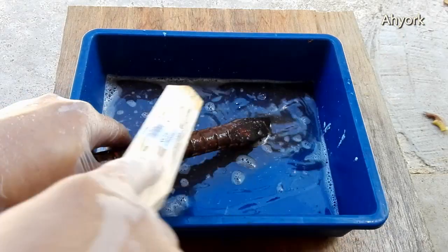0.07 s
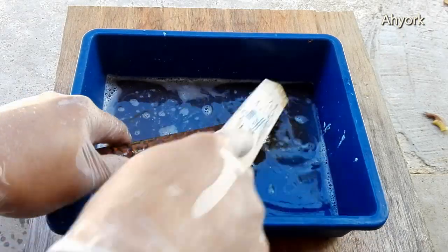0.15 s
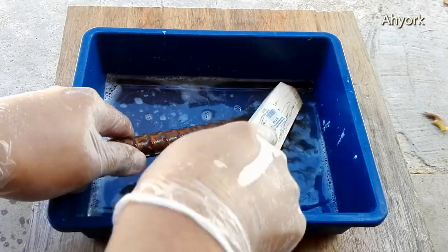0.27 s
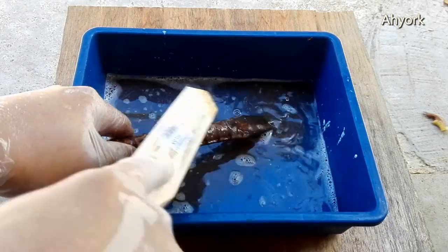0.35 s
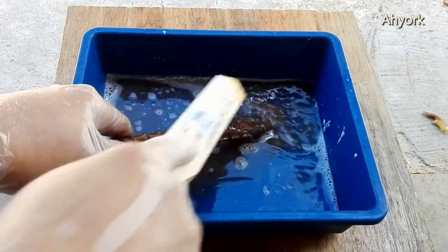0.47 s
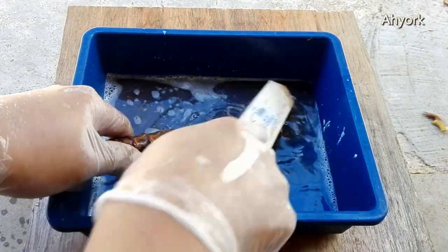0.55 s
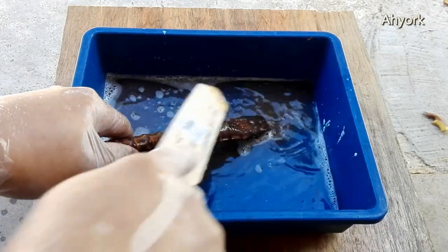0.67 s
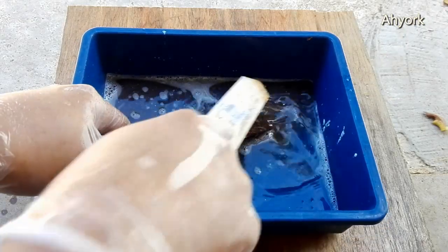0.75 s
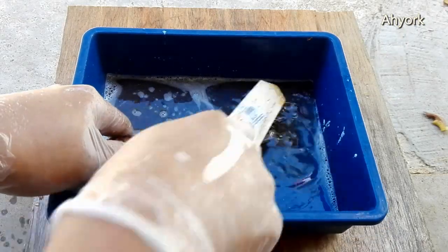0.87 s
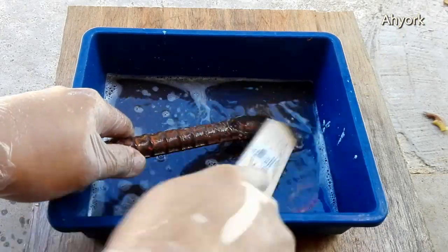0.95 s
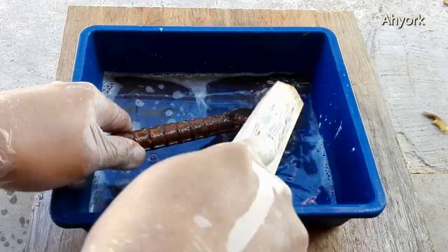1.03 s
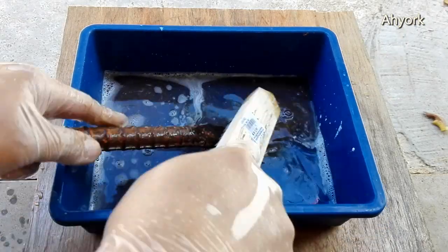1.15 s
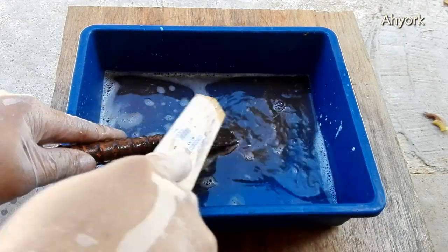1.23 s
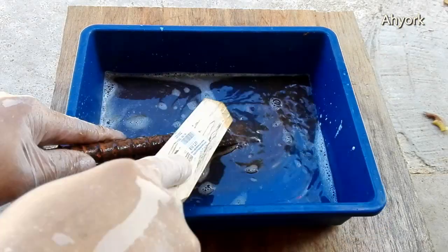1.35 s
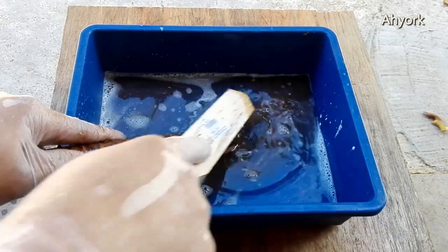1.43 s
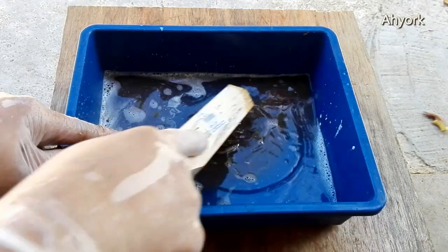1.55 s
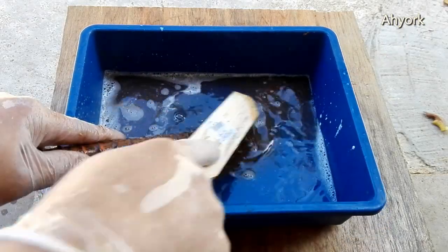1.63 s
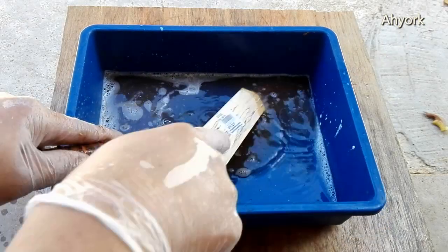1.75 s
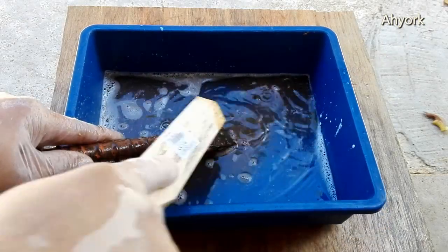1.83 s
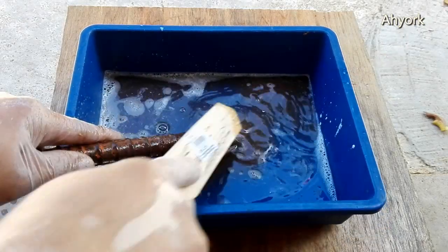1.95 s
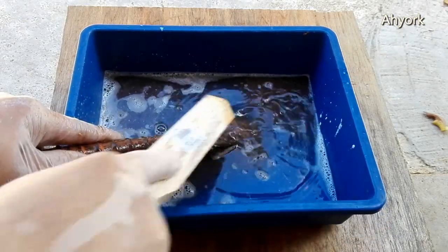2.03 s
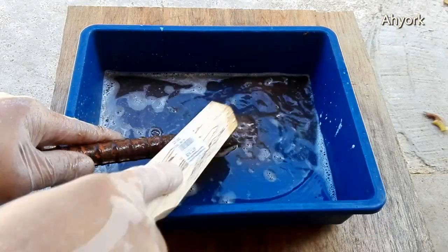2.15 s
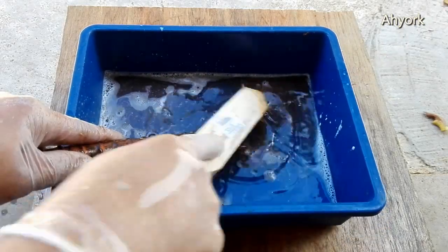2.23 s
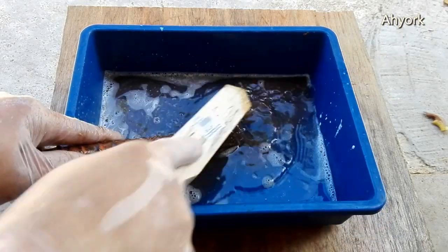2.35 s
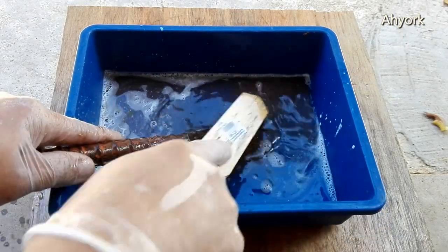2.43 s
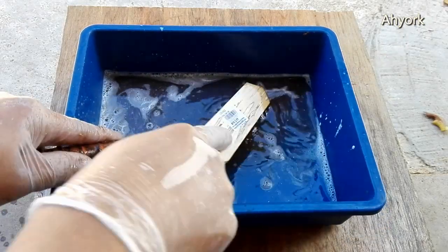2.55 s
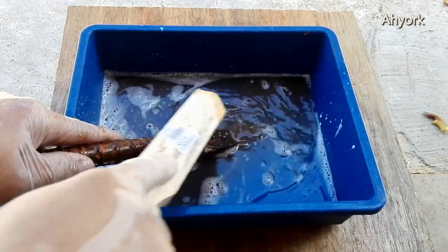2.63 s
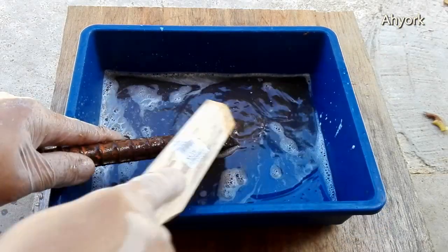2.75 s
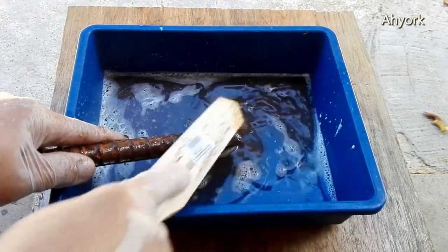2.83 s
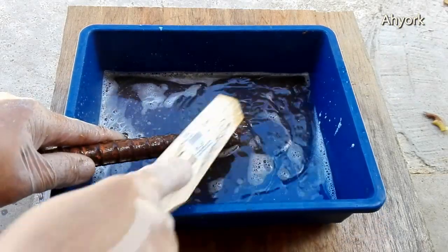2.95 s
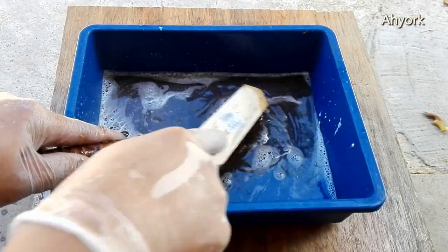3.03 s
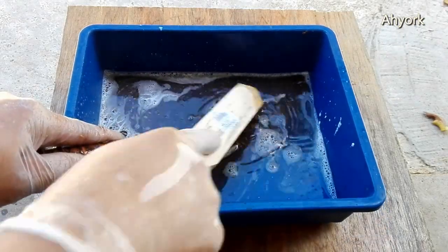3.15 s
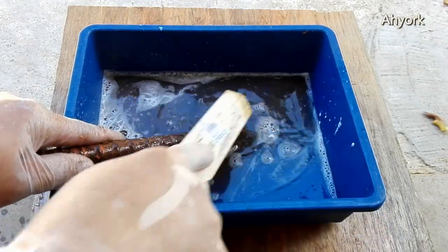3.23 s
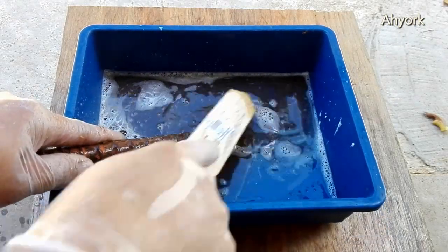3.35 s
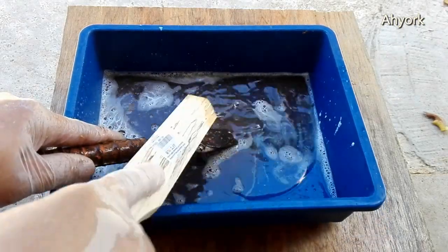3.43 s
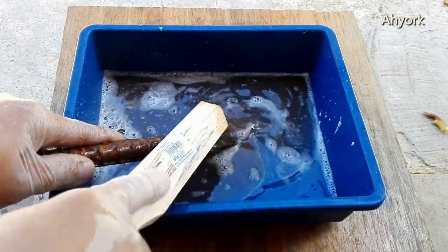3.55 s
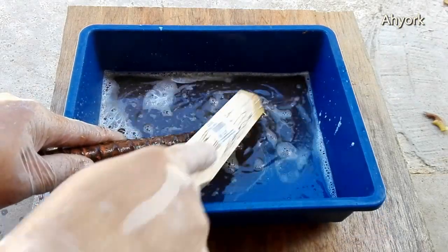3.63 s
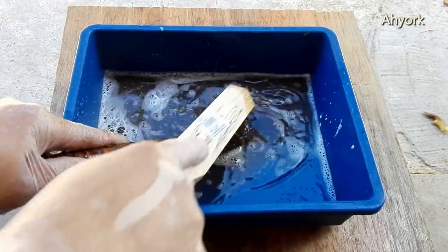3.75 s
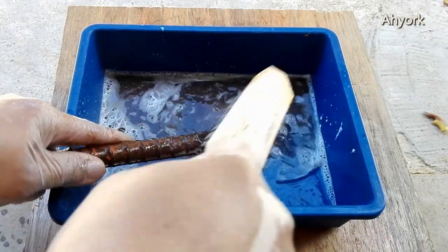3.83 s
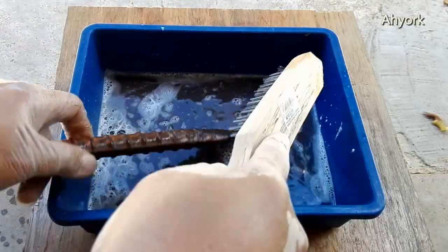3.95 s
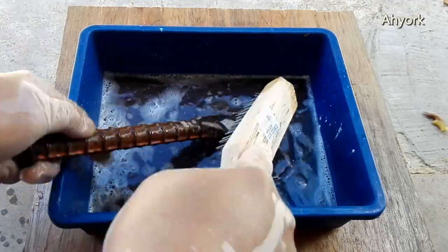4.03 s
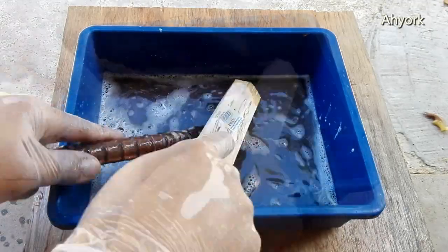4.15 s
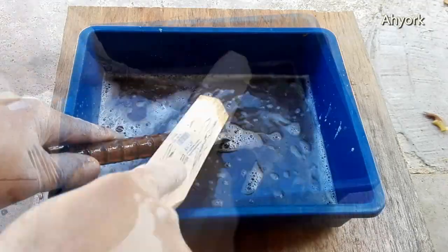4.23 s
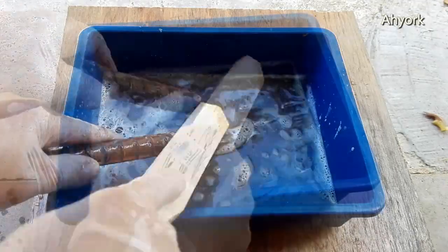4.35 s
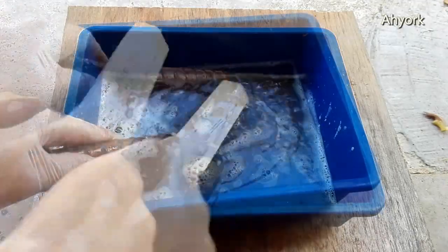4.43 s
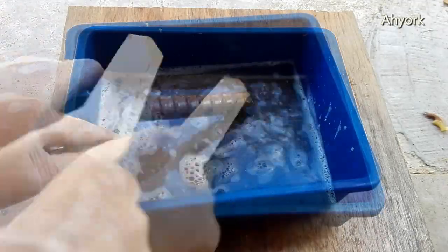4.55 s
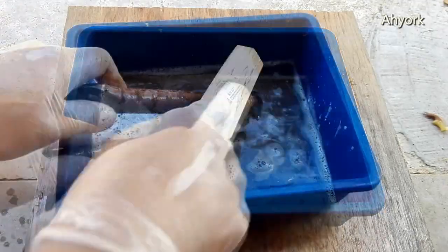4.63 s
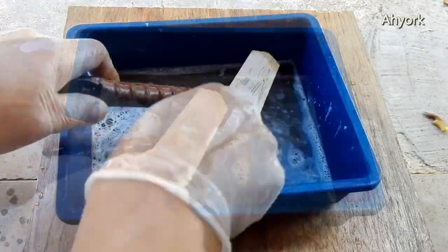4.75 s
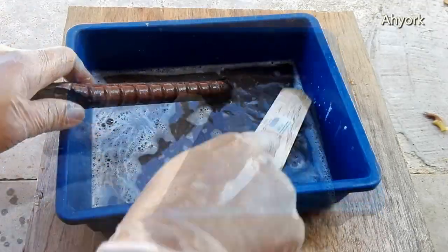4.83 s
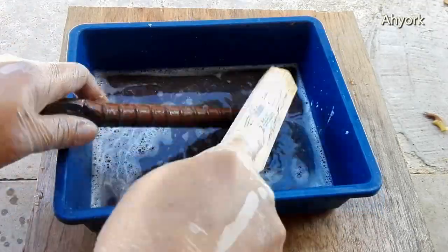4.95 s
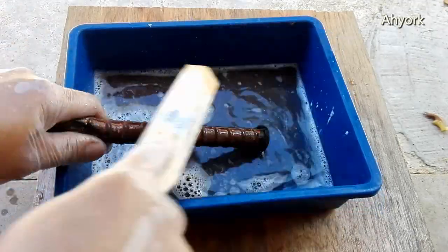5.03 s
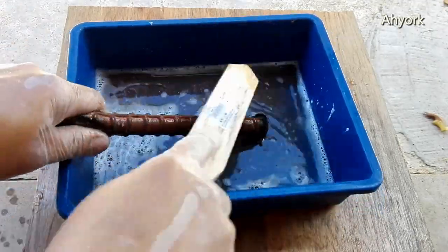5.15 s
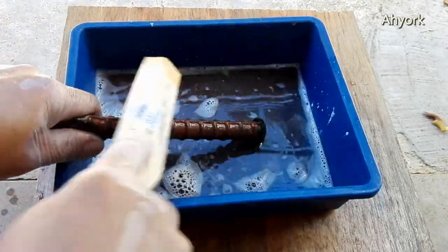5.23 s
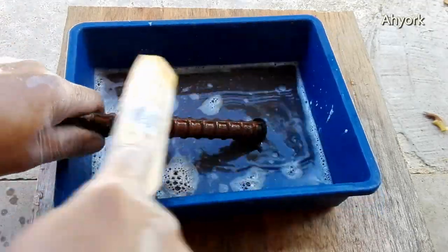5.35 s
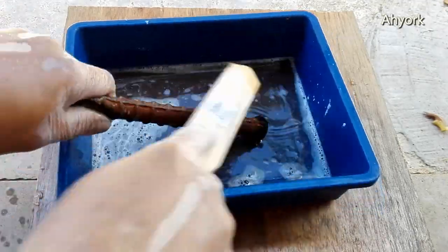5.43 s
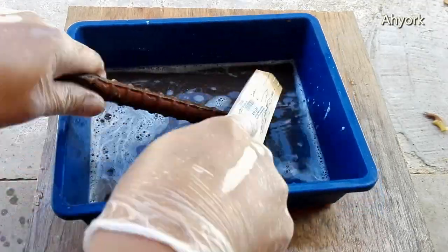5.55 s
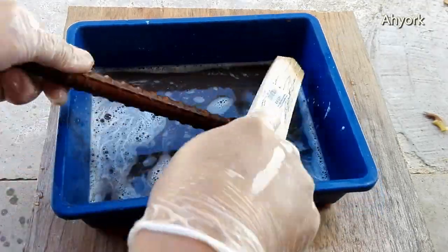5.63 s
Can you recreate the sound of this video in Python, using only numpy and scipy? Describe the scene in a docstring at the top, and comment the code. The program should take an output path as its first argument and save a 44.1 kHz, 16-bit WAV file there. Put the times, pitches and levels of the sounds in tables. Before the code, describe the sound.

A wire brush scrubs a rusty metal rod very fast in a tub of shallow water, harsh crackling hiss with short pauses and small knocks.

```python
"""A dense crackling hiss comes first: a steel wire brush scrubs a rusty rod in a plastic tub of shallow water.
It goes to and fro, mostly 14 to 18 strokes a second. Random clicks, filtered like bristles, make the hiss;
clicks through resonances make the rod and tub shake. Noise bursts and ringing tones make the rod's knocks.
Tiny noise grains crunch like rust, low noise sloshes and short fading tones gulp.
Behind it all are faint echoes and a steady outdoor hush."""
import sys
import numpy as np
from scipy import signal
from scipy.fft import rfft, irfft
from scipy.io import wavfile

SR = 44100
rng = np.random.default_rng(int(sys.argv[2]) if len(sys.argv) > 2 else 0)


def pcm_store(signal):
    """Save signal as 16-bit PCM."""
    levels = np.round(np.clip(np.atleast_2d(signal), -1, 1) * 32767)
    wavfile.write(sys.argv[1], SR, levels.astype(np.int16).T)


N = 250488
T = np.arange(N) / SR


def undb(db):
    """Turn decibels into gain."""
    return 10 ** (np.asarray(db) / 20)


def unit(x):
    """Scale each row to an average (rms) strength of 1."""
    return x / np.sqrt(np.mean(x ** 2, axis=-1, keepdims=True) + 1e-18)


def bins(size):
    """List the frequencies of a spectrum in Hz, kept above zero."""
    return np.maximum(np.fft.rfftfreq(size, 1 / SR), 1)


def shape(points, hz):
    """Read the gain at each frequency from a table of (Hz, dB) points."""
    f, db = np.transpose(points)
    return undb(np.interp(np.log(hz), np.log(f), db))


def colour(x, gain):
    """Filter a sound with one gain per frequency, without any sound before its start."""
    size = x.shape[-1]
    # folding the cepstrum forward in time gives a minimum-phase filter
    cepstrum = irfft(np.log(gain + 1e-6), size)
    cepstrum[1:size // 2] *= 2
    cepstrum[size // 2 + 1:] = 0
    return irfft(rfft(x) * np.exp(rfft(cepstrum)), size)


def add(out, s, x):
    """Mix a stereo sound in at time s."""
    i = int(s * SR)
    a, b = max(i, 0), min(i + x.shape[1], N)
    out[:, a:b] += x[:, a - i:b - i]


def walk(rate, size):
    """Wander at random between new values drawn rate times a second, with a spread near 1."""
    knots = rng.standard_normal(1024)
    return 1.2 * np.interp(np.arange(size) / SR * rate, np.arange(1024), knots)


def flicks(rate, spread_db, size):
    """Make two rows of random clicks, rate per second, of widely varying strength."""
    strength = undb(spread_db * np.clip(rng.standard_normal((2, size)), -3, 2.5))
    happens = rng.random((2, size)) < rate / SR
    return happens * rng.choice([-1, 1], (2, size)) * strength


# How wide the sound is. Each row: frequency in Hz, level of the side against the middle in dB.
SIDE_LEVEL = [(30, -29), (100, -18.5), (1000, -19.5), (1900, -14), (2450, -12), (2800, -7.5), (5500, -8),
              (8000, -8), (10000, -6), (11300, -24), (12800, -5), (13800, -8), (16000, -10)]


def stereo(pair):
    """Make left and right from two unrelated rows, middle and side; the treble is wider than the bass."""
    mid = pair[0]
    side = colour(pair[1], shape(SIDE_LEVEL, bins(pair.shape[1])))
    return np.array([mid + side, mid - side])


# Spells of even scrubbing, each opening with a push. Each row: start in seconds, end in seconds,
# number of strokes, share of a cycle spent pushing, time the bent wires scrape past each turn in seconds,
# bristle hiss in dB, rod and tub in dB on a push, rod and tub in dB on a pull.
# These levels are settings: scrubbing() lifts them, and the hiss varies from stroke to stroke.
SPELLS = [(-.087, 0.344, 6, 0.5, 0.0033, -31, -53.5, -60.5),
          (0.341, 0.775, 6, .55, 0.0035, -29, -42.5, -53),
          (0.779, 1.037, 4, 0.57, 0.0014, -29.5, -43, -53.5),
          (1.259, 1.716, 8, 0.46, 0.0046, -33, -43.5, -51.5),
          (1.717, 2.067, 6, 0.41, 0.007, -31, -43, -53.5), (2.062, 2.623, 10, 0.49, 0.005, -31, -42.5, -49),
          (2.62, 3.205, 10, 0.56, 0.0034, -30.5, -44, -52.5),
          (3.202, 3.854, 11, 0.53, 0.0085, -30.5, -45.5, -50),
          (4.236, 4.48, 4, .52, 0.0062, -35.5, -49.5, -54.5),
          (4.469, 4.746, 4, 0.58, 0.015, -34.5, -51, -55.5),
          (4.74, 4.835, 1, 0.41, 0.0044, -34.5, -55.5, -55),
          (5.065, 5.206, 2, 0.47, 0.0025, -34, -46.5, -59.5),
          (5.207, 5.59, 6, 0.54, 0.0029, -31, -59.5, -59.5)]
STROKE_SPREAD_DB = 1.5  # no two strokes are alike
PUSH_LEAN_DB, PULL_LEAN_DB = 6.3, 8  # growth during a stroke, roughly from first half to second
# the dip in the tone of a push and of a pull: shift of its centre in octaves, half width in Hz
PUSH_DIP, PULL_DIP = (.12, 270), (-.06, 430)


def to_and_fro():
    """Alternate pushes and pulls: rows (start s, end s, hiss dB, rod and tub dB, growth dB, dip)."""
    strokes = []
    for start, end, count, push_share, overlap_s, hiss_db, push_db, pull_db in SPELLS:
        k = np.arange(count + 1)
        # a whole cycle is a push and a pull
        cycles = k // 2 + push_share * (k % 2)
        turns = start + (end - start) * cycles / cycles[-1]
        for i, effort in enumerate(rng.standard_normal(count)):
            push = (push_db, PUSH_LEAN_DB, PUSH_DIP)
            pull = (pull_db, PULL_LEAN_DB, PULL_DIP)
            way = pull if i % 2 else push
            strokes.append((turns[i], turns[i + 1] + overlap_s, hiss_db + STROKE_SPREAD_DB * effort, *way))
    return strokes


# The brush grazes the rod while it is shifted. Each row: start in seconds, end in seconds,
# bristle hiss in dB, rod and tub in dB, growth in dB (both levels before the lift in scrubbing()).
GRAZES = [(1.024, 1.079, -47, -57.5, 5), (1.13, 1.261, -52.5, -63, 0), (4.018, 4.122, -59.5, -83, 14),
          (4.139, 4.224, -55, -64, 9), (4.841, 4.972, -43, -54.5, 1), (4.96, 5.039, -49, -62, -1),
          (5.569, 5.684, -54.5, -80, -16)]


def grazes():
    """Treat each light graze as a stroke with the tone dip of a pull."""
    return [(*graze, PULL_DIP) for graze in GRAZES]


# the wires catch unevenly on the rust: slow and fast swing of the force
SLOW_CATCH_DB, FAST_CATCH_DB = 1.0, 1.2
DIP_RISE_OCT = .18  # the dip climbs this far during a stroke


def scrubbing(strokes, size=8192):
    """Each stroke speeds up and eases off; tufts catch on the rust and let their wires go in bursts."""
    out, hz, t = np.zeros((2, N)), bins(size), T[:size]
    for start, end, hiss_db, tub_db, lean_db, (shift_oct, width_hz) in strokes:
        span = max(end - start, .02)
        lead = span / 10
        # place along the stroke: 0 at its start, 1 at its end
        along = np.minimum((t - lead) / span, 1.1)
        catching_db = SLOW_CATCH_DB * walk(132.6, size) + FAST_CATCH_DB * walk(599.0, size)
        force = undb(1.1 * lean_db * (along - .5) + catching_db)

        # under a light touch few wires flick and the hiss turns to crackle
        rate = 9000 * undb(0.57 * (hiss_db + 30.5))
        # now and then a bent wire snaps free with a tick of its own
        ticks = undb(-14) * unit(flicks(45, 4, size))
        wires = unit(flicks(rate, 3, size)) + ticks
        speed = glide(along, bite=.25, release=.4, rest=.28)
        hiss = colour(wires * force * speed, bristle_gain(start, hz, hiss_db))

        # the shaking of rod and tub grows less along the stroke than the hiss
        push = force * glide(along, bite=.2, release=.55, rest=.22) * undb(-4 * along)
        ring = tub(flicks(1200, 4, size) * push, start)
        sound = undb(hiss_db + 1.03) * unit(hiss) + undb(tub_db + 2.5) * unit(ring)

        # fade from a lower dip to a higher one during the stroke
        low_oct, high_oct = shift_oct - DIP_RISE_OCT / 2, shift_oct + DIP_RISE_OCT / 2
        early = colour(sound, tone_dip(start, hz, hiss_db, low_oct, width_hz))
        late = colour(sound, tone_dip(start, hz, hiss_db, high_oct, width_hz))
        sound = early + (late - early) * np.clip(2 * along - .5, 0, 1)
        # the square root keeps the level right over the stroke itself
        add(out, start - lead, stereo(sound * np.sqrt(span / t[-1])))
    return out


def glide(along, bite, release, rest):
    """Sliding speed over a stroke: the wires bite, run and ease off; a soft rustle carries over the turn."""
    rise = np.clip(along / bite, 0, 1)
    fall = np.clip((1 - along) / release, 0, 1)
    rustle = np.clip(5 * np.minimum(along + .1, 1.1 - along), 0, 1)
    return np.sin(np.pi / 2 * rise) ** 4 * np.sin(np.pi / 2 * fall) ** 2 + rest * rustle


# below a firm touch the hiss dulls: its level there, the range down to the lightest touch
FIRM_DB, TOUCH_RANGE_DB = -36.5, 0.5
FIRM_TILT_DB, LIGHT_TILT_DB = 0.06, -4  # brightness in dB per octave


def firmness(level_db):
    """Tell how hard the brush is pressed: 0 for the lightest touch, 1 for firm scrubbing."""
    return np.interp(level_db, [FIRM_DB - TOUCH_RANGE_DB, FIRM_DB], [0, 1])


# Tone of the scrubbing over time, with a thin place in the sound between low ring and hiss.
# Each row: time in seconds, wire resonance in Hz, its lift in dB, lower edge of the hiss in Hz,
# centre of the thin place (the dip) in Hz, its depth in dB.
# The wire resonance and the dip are varied at random around these values.
SCRUB_TONE = [(0, 11500, 1, 2830, 1630, -16), (.3, 12400, 8.5, 2680, 1960, -18),
              (.95, 12250, -1, 2720, 1950, -12), (2, 12000, -0.5, 2800, 2080, -10),
              (2.6, 11200, 1.5, 2370, 2380, -12), (3.7, 11000, 0.5, 2470, 2350, -13),
              (4.3, 10850, 0.5, 2830, 1820, -9), (4.9, 11400, 6.5, 2840, 1700, -9),
              (5.101, 11000, 8.5, 3130, 1390, -30), (5.6, 10000, 4, 3200, 1320, -10)]
# Basic colour of the bristle hiss. Each row: frequency in Hz, level in dB per Hz.
BRISTLE_COLOUR = [(2800, -7), (4400, -5.5), (5200, -2.5), (5600, -.5), (6100, -3), (7100, 0), (8000, -3.5),
                  (9000, -1), (9700, 0), (11000, 2), (12400, 3), (13500, -4), (15700, 0.5)]


def bristle_gain(s, hz, level_db=0, wire_width_hz=600, wire_scatter=0.021, leak_db=-9, ripple_db=2.33):
    """Colour of one stroke: a steep lower edge, ringing wires and a random ripple; a light touch is duller."""
    times, *columns, _, _ = np.transpose(SCRUB_TONE)
    wire_hz, wire_db, edge_hz = (np.interp(s, times, c) for c in columns)
    tilt_db = LIGHT_TILT_DB + (FIRM_TILT_DB - LIGHT_TILT_DB) * firmness(level_db)
    wire_hz = wire_hz * (1 + wire_scatter * rng.standard_normal())
    # a little sound leaks through below the edge
    leak = undb(leak_db - 0.88 * tilt_db) * hz / (hz + 700) / (1 + (hz / edge_hz) ** 10)
    edge = 1 / np.sqrt(1 + (edge_hz / hz) ** 20) + leak
    wires = wire_db / (1 + ((hz - wire_hz) / wire_width_hz) ** 2)
    tilt = tilt_db * np.log2(np.maximum(hz, edge_hz) / 8000)
    ripple = np.interp(hz, np.linspace(0, SR / 2, 70), rng.standard_normal(70))
    return shape(BRISTLE_COLOUR, hz) * edge * undb(wires + tilt + ripple_db * ripple)


def tone_dip(s, hz, level_db, shift_oct, width_hz):
    """A thin place in a firm stroke's sound, between low ring and hiss; its place and depth vary at random."""
    times, *_, centres, depths = np.transpose(SCRUB_TONE)
    centre_hz = np.interp(s, times, centres) * 2 ** (shift_oct + .08 * rng.standard_normal())
    depth_db = firmness(level_db) * np.interp(s, times, depths) * rng.uniform(.5, 1.5)
    return undb(depth_db * np.exp(-2 * ((hz - centre_hz) / width_hz) ** 2))


# Resonances (modes) of the rod and tub. Each row: typical frequency in Hz, width in Hz,
# typical level in dB in the first grip, in the second, in the third.
TUB_MODES = [(446, 88, -10, -12.5, 0.5), (534, 85, 1, -7, -11), (620.3, 63, -5.5, 0.5, -1),
             (670, 153, -8.5, -0.5, -0.5), (973.4, 70, 0.5, 3.5, -3), (1064, 94, 0.5, -3, -20),
             (1137, 80, 3, -1.5, -14), (1394, 74, -5, -9.5, -40), (1550, 86, -9, -10, -32),
             (1820, 630, -11.5, -14.5, -27)]
# Times when the grip changes, in seconds.
REGRIP_TIMES = [1.3, 5.03]


def tub(push, s, detune=0.01, vary_db=1.5):
    """Rod and tub ring at their resonances, which shift a little with every placing of the brush."""
    hz, grip = bins(push.shape[1]), np.searchsorted(REGRIP_TIMES, s)
    response = 0
    for k, (f, width, *dbs) in enumerate(TUB_MODES):
        f = f * (1 + detune * rng.standard_normal())
        gain = undb(dbs[grip] + vary_db * rng.standard_normal())
        # neighbouring modes swing in opposite directions
        response = response + (-1) ** k * gain / (1 + 1j * f / width * (hz / f - f / hz))
    return irfft(rfft(push) * response)


# A tuft snags hard on a ridge and springs free. Each row: time in seconds, level in dB.
HARD_SNAGS = [(.068, -30), (.141, -29), (.22, -25), (.353, -24), (.4, -26), (.461, -28), (.674, -26),
              (.928, -28), (2.268, -24), (2.494, -24), (2.846, -27), (2.873, -25), (2.961, -26),
              (3.076, -22), (3.657, -27), (4.465, -30), (4.772, -28)]


def snags(strokes, size=4096):
    """A snagged tuft springs free: wire flicks build fast and die within a few hundredths of a second."""
    out, hz, t = np.zeros((2, N)), bins(size), T[:size]
    build_s, spring_s = .003, .007
    burst = (1 - np.exp(-t / build_s)) * np.exp(-t / spring_s)
    for s, db in catches(strokes) + list(HARD_SNAGS):
        gain = bristle_gain(s, hz) * tone_dip(s, hz, FIRM_DB, *PULL_DIP)
        shower = unit(colour(flicks(4300, 3.2, size), gain))
        add(out, s, stereo(shower * burst / burst.max() * undb(db)))
    return out


# delay after each turn in seconds, level against the stroke's hiss setting, spread
CATCH_S, CATCH_DB, CATCH_SPREAD_DB = 0.012, -6, 1.5


def catches(strokes):
    """The tufts snag lightly as each stroke takes hold: rows (time s, level dB)."""
    events = []
    for start, _, hiss_db, *_ in strokes:
        spread_db = CATCH_SPREAD_DB * np.clip(rng.standard_normal(), -2, 1)
        events.append((start + CATCH_S, hiss_db + CATCH_DB + spread_db))
    return events


# Knocks and clicks of rod and brush. Each row: time in seconds, level in dB over 5 ms,
# sharp crack in dB against the tub's ring, ring of the rod in dB against the tub's ring,
# brightness of the crack in dB per octave.
KNOCKS = [(.387, -27, 20, 0, 4), (.95, -28, 20, 0, 4), (.791, -27, 10, -8, 6), (.99, -30, 14, -5, 5),
          (1.0103, -17, 7, -4, 1.5), (1.254, -26, 4, 5, -4), (1.327, -30, 10, -8, 3),
          (1.382, -29, 8, -8, 4), (1.496, -25.5, 12, -5, 3), (1.843, -27, 8, -6, 2), (1.936, -30, 9, 3, 0),
          (1.957, -26, 3, -8, 4), (2.072, -27, 6, -6, 4), (2.166, -32, 12, 0, 2), (2.275, -29, 6, -3, 2),
          (2.588, -29, 8, -6, 4), (2.876, -21, 22, 0, 6), (2.946, -29, 14, 3, 1), (3.077, -24, 20, 3, 4),
          (4.093, -39, 0, 0, -3), (4.152, -48, 8, 10, -4), (4.177, -33, 0, 3, -2), (4.239, -38, 8, -2, 2),
          (4.388, -34, -2, -6, 2), (4.432, -32, 16, 0, 4), (4.487, -35, 14, 8, -1), (4.821, -39, 16, 8, -1),
          (4.855, -39, 20, 4, 3), (4.907, -31, 6, 3, -2), (4.926, -37, 4, -3, -2), (4.996, -34, 18, 10, -2),
          (5.041, -28, 30, 0, 9), (5.077, -25, 24, 0, 8), (5.218, -28, 26, 0, 7)]


def knocks(size=8192):
    """Steel strikes steel with a short crack and a faint rattle, and rod and tub ring with it."""
    out, t = np.zeros((2, N)), T[:size]
    crack_s, rattle_s, rattle_db = .0015, .008, -21
    contact = np.exp(-t / crack_s) + undb(rattle_db) * np.exp(-t / rattle_s)
    for s, db, crack_db, rod_db, tilt_db in KNOCKS:
        blow = rng.standard_normal((2, size)) * contact
        ring = unit(np.array([rod(t), rod(t)]))
        sound = undb(crack_db) * crack(blow, tilt_db) + undb(rod_db) * ring + unit(tub(blow, s))
        add(out, s, stereo(unit(sound) * undb(db) * np.sqrt(.005 / t[-1])))
    return out


# Basic colour of a crack. Each row: frequency in Hz, level in dB per Hz.
CRACK_COLOUR = [(300, -17), (1000, -14), (1800, 7.5), (2300, 3), (2800, -11), (4000, -7.5), (5500, 4),
                (9000, -21), (16000, 15)]


def crack(x, tilt_db):
    """Colour noise like steel striking steel; a higher tilt is brighter, like a lone wire clicking."""
    hz = bins(x.shape[1])
    tilt = undb(tilt_db * np.log2(np.maximum(hz / 2500, 1)))
    return unit(colour(x, shape(CRACK_COLOUR, hz) * tilt))


# Resonances of the struck steel rod. Each row: typical frequency in Hz,
# time to fade by 60 dB in seconds, typical starting level in dB.
ROD_MODES = [(835, 0.053, 3), (1623, 0.033, -3.5), (2550, 0.019, -5), (3128, 0.015, 2), (3720, 0.022, 7),
             (4404, 0.021, 0)]


def rod(t, vary_db=2):
    """The struck rod rings briefly, damped by hand and water; each blow stirs its modes differently."""
    ring = 0
    for f, t60, db in ROD_MODES:
        fade = undb(db + vary_db * rng.standard_normal() - 60 * t / t60)
        f = f * (1 + 0.019 * rng.standard_normal())
        ring = ring + fade * np.sin(2 * np.pi * f * t)
    return ring


# Loose rust crunches under the wires. Each row: start in seconds, end in seconds,
# grains per second, level in dB, brightness in dB per octave.
RUST_SPELLS = [(1.3, 3.85, 14, -49, 5), (4.03, 4.11, 700, -57, 5), (4.25, 4.75, 45, -47, 2),
               (4.8, 4.955, 130, -46, -1.5), (5.585, 5.665, 300, -54, 11)]


def grit(size=131072):
    """Flakes of rust break one by one, each with a tiny crunch of fading noise."""
    out, t = np.zeros((2, N)), T[:size]
    crunch = np.exp(-t[t < .01] / .0006)
    for start, end, rate, db, tilt_db in RUST_SPELLS:
        breaks = np.abs(flicks(rate, 4, size)[0]) * (t < end - start)
        grains = rng.standard_normal((2, size)) * signal.oaconvolve(breaks, crunch)[:size]
        level = undb(db) * np.sqrt((end - start) / t[-1])
        add(out, start, stereo(crack(grains, tilt_db) * level))
    return out


# How strongly the stirred water sounds. Each row: time in seconds, level in dB.
SLOSH_LEVEL = [(0, -52.5), (.92, -49), (1.02, -43), (1.12, -58.5), (1.3, -46), (1.58, -52.5), (1.75, -51.5),
               (2.4, -50.5), (3.2, -53), (3.39, -45), (3.6, -54.5), (4.2, -50), (4.66, -58), (4.8, -51),
               (5.68, -50)]
# Colour of the sloshing. Each row: frequency in Hz, level in dB per Hz.
WATER_COLOUR = [(20, -41), (45, -5), (90, 2.5), (135, 4.5), (165, -2), (205, 3.5), (280, -4), (370, 3.5),
                (500, -8.5), (800, -24.5), (2000, -44), (8000, -32)]


def water():
    """Low, uneven sloshing around the rod, made from noise of wandering strength."""
    level_db = np.interp(T, *np.transpose(SLOSH_LEVEL))
    churn = rng.standard_normal((2, N)) * undb(3.5 * walk(40, N))
    slosh = unit(colour(churn, shape(WATER_COLOUR, bins(N))))
    return stereo(slosh * undb(level_db))


# The rod plunges and the water gulps. Each row: time in seconds, pitch in Hz,
# level in dB from which the tone fades.
GULPS = [(1.311, 139, -33.5), (1.36, 201, -38), (3.365, 189, -36), (3.418, 146, -38), (4.22, 130, -39.5),
         (5.076, 195, -40.5)]


def gulps(decay_s=0.015, size=4096):
    """Large pockets of water swing for a few cycles: short fading tones in the middle."""
    out, t = np.zeros((2, N)), T[:size]
    for s, hz, db in GULPS:
        swing = np.sin(2 * np.pi * hz * t) * np.exp(-t / decay_s)
        add(out, s, np.ones((2, 1)) * undb(db) * swing)
    return out


# Colour of the outdoor hush. Each row: frequency in Hz, level in dB per Hz.
HUSH_COLOUR = [(30, 14.5), (300, 2.5), (700, -7), (2000, -14), (6000, -3), (16000, -54)]


def yard(near, t60=0.18, echo_db=-28, air_db=-64, size=16384):
    """Faint echoes from nearby walls, made with fading noise, over a steady outdoor hush."""
    t = T[:size]
    # the echoes begin after 4 ms
    tails = rng.standard_normal((2, size)) * undb(-60 * t / t60) * (t > .004)
    centre = near.mean(axis=0)
    echoes = np.array([signal.fftconvolve(centre, tail / np.linalg.norm(tail))[:N] for tail in tails])
    hush = unit(colour(rng.standard_normal((2, N)), shape(HUSH_COLOUR, bins(N))))
    return undb(echo_db) * echoes + undb(air_db) * stereo(hush)


def scene():
    """Brush, knocks, rust and water in the yard."""
    strokes = to_and_fro()
    brush = scrubbing(strokes + grazes()) + snags(strokes)
    near = brush + knocks() + grit() + water() + gulps()
    return near + yard(near)


def record(dry, top_hz=15800):
    """The recorder cuts the top steeply, with a low-pass filter."""
    return signal.sosfilt(signal.ellip(12, .2, 80, top_hz, fs=SR, output="sos"), dry)


dry = scene()
out = record(dry)
pcm_store(out)
```